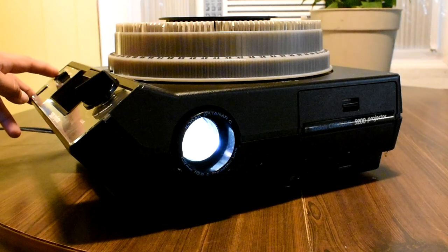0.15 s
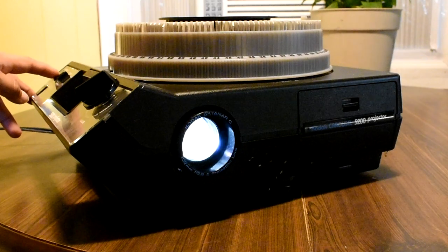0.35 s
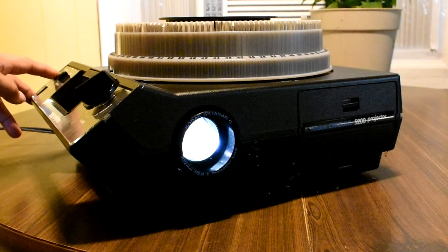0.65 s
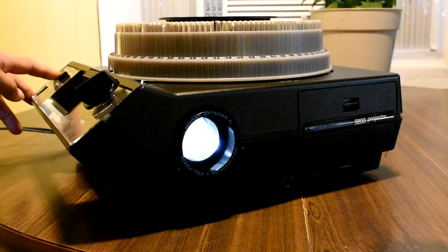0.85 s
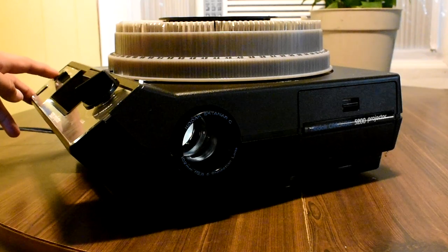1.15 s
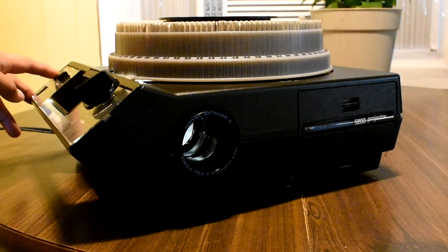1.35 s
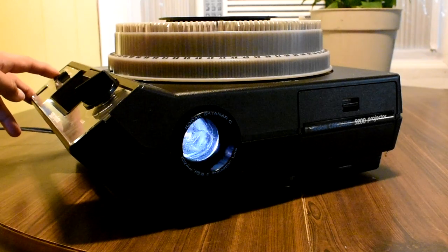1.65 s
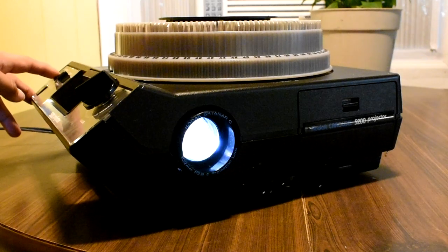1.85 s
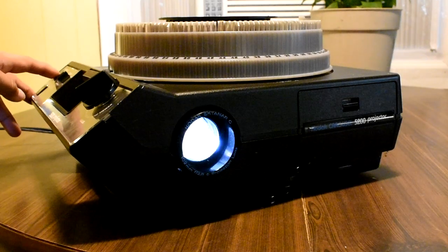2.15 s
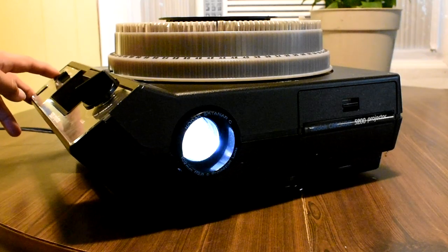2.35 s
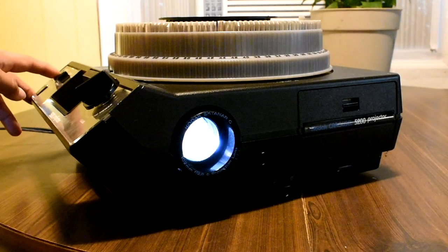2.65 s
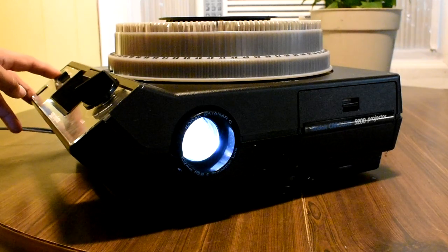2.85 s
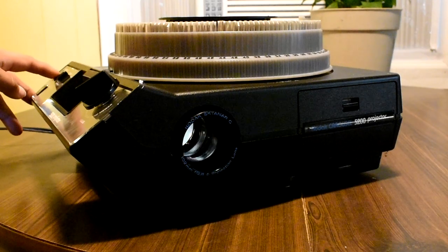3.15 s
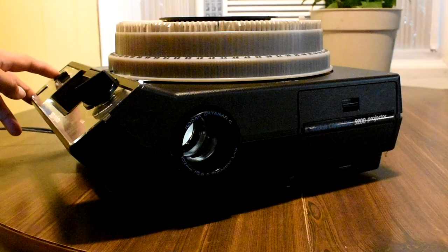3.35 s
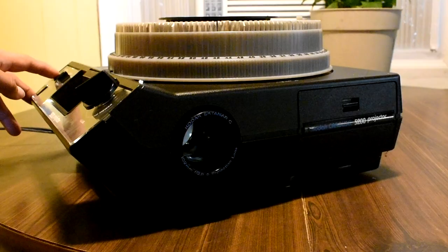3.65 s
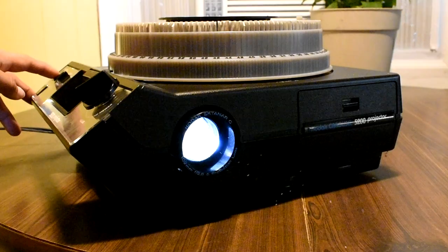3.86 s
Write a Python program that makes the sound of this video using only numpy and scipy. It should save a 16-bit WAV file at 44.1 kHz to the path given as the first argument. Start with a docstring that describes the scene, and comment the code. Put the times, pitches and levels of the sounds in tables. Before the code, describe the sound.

Two bursts of mechanical clicks and clunks from a slide projector, its cooling fan whirring throughout.

```python
"""Two bursts of clicks and clacks over a steady whir: a carousel slide projector changes slides twice.
Each time the gears rustle, the shutter closes, the slide lifts, the tray lever strikes and rings,
latches snap and the next slide drops in. Every blow shakes the plastic case or sets a small part ringing.
A faint thump comes with the loudest clacks. The whir is the cooling fan. A small room adds a short tail."""
import sys
import numpy as np
from scipy import signal
from scipy.fft import rfft, irfft
from scipy.io import wavfile

SR = 44100
rng = np.random.default_rng(int(sys.argv[2]) if len(sys.argv) > 2 else 0)


def generate_wav(sig):
    """Save sig (samples, or channels by samples) to the path in sys.argv[1] as 16-bit PCM at SR."""
    pcm = np.round(np.clip(np.atleast_2d(sig).T, -1, 1) * 32767).astype(np.int16)
    wavfile.write(sys.argv[1], SR, pcm)


N = 176400

# the tray lever's modes (the notes it rings at): f/Hz, level/dB, t60/s (time to fade by 60 dB)
LEVER_MODES = [(1173, -20, .16), (1449, -19, .16), (1642, -10, .16), (1672, -12, .17), (2266, -15, .19),
               (2300, -13, .14), (2358, -10, .17), (2461, 0, .16), (2594, -15, .18)]
# the lever's blows: t/s, level/dB
LEVER_STRIKES = [(1.436, -28.5), (1.4445, -10), (3.557, -36), (3.569, -12)]


def contacts():
    """Parts knock together: each hit cracks, shakes the plastic case and fades in the room."""
    # the hits: t/s, low knock/dB, middle clack/dB, high click/dB
    hits = np.array([ (0.825, -42, -27, -29), (0.832, -22, -23.5, -20), (0.8455, -28, -24.5, -27),
                     (.852, -23.5, -24, -30), (0.891, -35, -31, -31), (0.908, -50, -26, -23.5),
                     (.972, -33, -32, -52), (1.039, -38, -19.5, -20.5), (1.047, -22, -47, -29),
                     (1.084, -42, -34, -32), (1.092, -38, -28, -38), (1.159, -32, -40, -38),
                     (1.174, -27, -31.5, -45), (1.195, -34, -28.5, -33), (1.405, -32, -33, -32),
                     (1.426, -25, -22, -39), (1.433, -26.5, -12, -32), (1.4435, -19, -16.5, -12),
                     (1.559, -31, -18, -15), (1.58, -22.5, -18.5, -26), (1.6361, -46, -20, -19.5),
                     (1.664, -19, -27, -21.5), (1.677, -29.5, -19, -22), (1.688, -47, -17, -40),
                     (1.722, -28, -38, -50), (1.76, -24.5, -50, -54), (1.77, -55, -32.5, -35.5),
                     (2.936, -39, -25.5, -23.5), (2.942, -28, -27, -24), (2.953, -22, -18.5, -19.5),
                     (3.013, -54, -30, -30.5), (3.030, -37, -27.5, -23.5), (3.093, -32, -30, -59),
                     (3.160, -42, -24, -22.5), (3.172, -21, -29, -29), (3.207, -46, -31, -28.5),
                     (3.213, -29, -35, -33), (3.282, -33, -39, -35), (3.294, -29, -24.5, -40),
                     (3.32, -36, -26, -42), (3.527, -37, -28.5, -35), (3.549, -29, -18, -46),
                     (3.557, -27, -17, -31), (3.5671, -19.5, -18, -9.5), (3.58, -30, -10, -62),
                     (3.6825, -26.5, -19, -14), (3.701, -23, -18.5, -29), (3.7605, -34, -22, -18),
                     (3.788, -17.5, -29, -24.5), (3.801, -31, -17, -21.5), (3.819, -42, -37, -31),
                     (3.857, -25, -36, -39), (3.883, -21, -34, -35.5), (3.895, -49, -40, -37.5)])
    case_colour = [(60, -67), (150, -47), (260, -43.5), (370, -18.5), (500, -21.5), (750, -9),
                   (1100, -10.5), (1700, -10.5), (2400, -12.5), (3200, -12), (4500, -14), (6300, -13.5),
                   (8500, -10), (11000, -11), (15000, -16)]  # how strongly the case sounds: f/Hz, level/dB per third octave
    case_fade = [(400, 0.024), (2000, 0.08), (5000, 0.075), (12000, 0.057)]  # how fast it fades: f/Hz, t60/s
    room = [(400, 0.23, -5.5), (2030, 0.37, -8.5), (5000, 0.25, -8.5), (12000, 0.19, -9)]  # the room's tail: f/Hz, t60/s, level/dB
    knock_hz, clack_hz, click_hz = 840, 2200, 8500
    crack_s, swell_cycles = .0006, 1.6
    times, click_db = hits[:, 0], hits[:, 3]
    crack_db = 9 + .95 * (click_db + 9)  # harder clicks crack much more
    edges = 16500 * 2 ** (np.arange(-25, 1) / 3)  # bands a third of an octave wide
    out = np.zeros(N)
    for low, high in zip(edges, edges[1:]):
        hz = np.sqrt(low * high)
        hit_db = [np.interp(np.log(hz), np.log([knock_hz, clack_hz, click_hz]), hit[1:]) for hit in hits]
        db = np.array(hit_db) + at_hz(case_colour, hz)
        blows = impulses(times, from_db(db) ** 2)
        energy = fade(blows, at_hz(case_fade, hz))
        energy += from_db(at_hz(room, hz, column=2)) ** 2 * fade(blows, at_hz(room, hz))
        swell = np.exp(-hz / (swell_cycles * SR))  # low bands build up more slowly
        energy = signal.lfilter([1 - swell], [1, -swell], energy)
        cracks = impulses(times, from_db(db + crack_db) ** 2)
        cracks = signal.lfilter([1], [1, -np.exp(-1 / (crack_s * SR))], cracks)
        energy += min(hz / click_hz, 1) * cracks  # mostly in the treble
        loudness = np.sqrt(energy * SR / 2 / (high - low))
        band = signal.butter(2, [low, high], "band", fs=SR, output="sos")
        out += signal.sosfilt(band, loudness * rng.standard_normal(N))
    return out


def case_echoes(sound):
    """Eight quick echoes inside the case colour every hit in the same way."""
    delays_s = rng.uniform(.0006, .006, 8)
    echoes = impulses(delays_s, .08 * rng.choice([-1, 1], len(delays_s)))
    echoes[0] = 1  # the direct sound
    return signal.fftconvolve(sound, echoes / np.linalg.norm(echoes))[:N]


def lever():
    """The tray lever strikes lightly, then hard, and rings."""
    return struck_part(LEVER_MODES, LEVER_STRIKES)


def slide():
    """The slide drops into place with two quick taps."""
    modes = [(440, -11.5, .08), (510, -9.5, .09), (560, -7.5, .14), (2770, -4, .08), (2872, -2, .08),
             (3010, -5, .05)]  # f/Hz, level/dB, t60/s
    strikes = [(1.666, -23), (1.679, -20), (3.790, -23.5), (3.802, -20)]  # t/s, level/dB
    return struck_part(modes, strikes)


def shutter():
    """The shutter closes with a short, hollow ring."""
    modes = [(550, -4.5, 0.1), (761.4, 3, 0.17), (802, -14, 0.12), (3050, 2, 0.034)]  # f/Hz, level/dB, t60/s
    strikes = [(1.039, -27), (3.161, -26.5)]  # t/s, level/dB
    return struck_part(modes, strikes)


def latches():
    """The latches snap with a high ping."""
    modes = [(3960, -2.5, 0.15), (4700, 3, 0.055), (4930, 3, 0.057), (7700, 0, 0.05)]  # f/Hz, level/dB, t60/s
    strikes = [(.909, -33), (1.560, -25.5), (1.637, -38), (3.031, -32), (3.318, -42), (3.683, -33),
               (3.761, -36)]  # t/s, level/dB
    return struck_part(modes, strikes)


def spring():
    """A jolted spring rings at two close pitches."""
    modes = [(1643, -3, .19), (1672, -1.5, .19)]  # f/Hz, level/dB, t60/s
    strikes = [(1.06, -29.5), (1.115, -34.5), (1.178, -33), (1.454, -23), (3.235, -37), (3.578, -31)]  # t/s, level/dB
    return struck_part(modes, strikes)


def pawl():
    """A light catch (the pawl) gives bright ticks, too brief to shake the case."""
    snaps = [(0.827, -22), (0.8332, -29), (.858, -22), (1.196, -34), (2.9349, -21), (3.559, -22)]  # t/s, level/dB
    times, db = np.transpose(snaps)
    bright_above_hz = 4140
    energy = fade(impulses(times, from_db(db) ** 2), t60=0.01)
    return np.sqrt(energy) * noise(lambda f: f ** 2 / (f ** 2 + bright_above_hz ** 2))


def frame():
    """The projector's frame answers a few blows with a low ring."""
    modes = [(351, -1.5, 0.26), (372.2, 4, 0.18)]  # f/Hz, level/dB, t60/s
    strikes = [(.863, -36), (1.446, -39), (3.571, -39.5)]  # t/s, level/dB
    return struck_part(modes, strikes)


def tray_rubs():
    """The turning tray rubs the lever: many tiny slips, easing off, keep it ringing."""
    rubs = [(1.172, 1.218, -40), (3.292, 3.338, -35)]  # start/s, end/s, level/dB
    slips_per_s = 600
    t, out = np.arange(N) / SR, np.zeros(N)
    slips = (rng.random(N) < slips_per_s / SR) * rng.standard_normal(N)
    for start, end, db in rubs:
        during = (t > start) & (t < end)
        easing = np.sqrt(np.clip((end - t) / (end - start), 0, 1))
        force = slips * during * easing + 1e-18
        sound = sum(ring(force, hz, t60) * from_db(mode_db) for hz, mode_db, t60 in LEVER_MODES)
        out += from_db(db) * sound / sound[during].std()
    return out


def low_thump():
    """A faint, deep thump comes with the loudest clacks."""
    modes = [(62, -48, .08)]  # f/Hz, level/dB, t60/s
    return struck_part(modes, LEVER_STRIKES)


def gears():
    """The gears rustle for as long as a slide change lasts."""
    runs = [(0.844, 1.806, -44), (2.94, 3.925, -44.5)]  # start/s, end/s, level/dB
    colour = [(150, -28), (360, -0.5), (1700, 3), (2600, -3), (4500, -8.5), (15000, -22)]  # the rustle's spectrum: f/Hz, level/dB
    t, ramp_s = np.arange(N) / SR, 0.17
    level = sum(from_db(db) * np.clip(np.minimum(t - start, end - t) / ramp_s, 0, 1)
                for start, end, db in runs)
    return level * noise(lambda f: from_db(at_hz(colour, f)))


def fan():
    """Air flutters through the vents while the motor and blades hum at wavering pitches."""
    colour = [(18, -74), (30, -42), (81, -38.5), (111, -32), (208, -20.5), (243, -10), (277, -21.5),
              (350, -5.5), (479, -12.5), (575, -4.5), (639, -10.5), (709, -0.5), (767, -5.5), (1140, -5.5),
              (1470, -13), (1770, -9.5), (2360, -15.5), (2550, -16.5), (2910, -14.5), (4310, -23),
              (10500, -32.5), (15500, -46)]  # the air's spectrum: f/Hz, level/dB
    tones = [(361, -58, 6), (688, -55, 12), (724, -54.5, 6), (876, -53, 15), (1173, -52, 4.5),
             (1640, -60, 10)]  # motor and blade tones: f/Hz, level/dB, waver/Hz
    air_db, flutter_db = -42, 0.68
    air_level = from_db(air_db + flutter_db * wander(hz=54))
    out = air_level * noise(lambda f: from_db(at_hz(colour, f)))
    for hz, db, waver in tones:
        pitch = hz + waver * wander(waver)
        out += from_db(db) * np.sqrt(2) * np.sin(2 * np.pi * np.cumsum(pitch) / SR)
    return out


def struck_part(modes, strikes):
    """A struck part rings in all its modes, in a slightly different mix at every blow."""
    times, strike_db = np.transpose(strikes)
    spread_db = 2.9 * rng.standard_normal((len(times), len(modes)))
    out = np.zeros(N)
    for k, (hz, mode_db, t60) in enumerate(modes):
        blows = impulses(times, from_db(strike_db + mode_db + spread_db[:, k]))
        out += (-1) ** k * ring(blows, hz, t60)  # every other mode swings the opposite way
    return out


def ring(clicks, hz, t60):
    """Each click starts a fading sine wave as tall as the click."""
    decay, step = 1e-3 ** (1 / (t60 * SR)), 2 * np.pi * hz / SR
    return signal.lfilter([0, np.sin(step)], [1, -2 * decay * np.cos(step), decay * decay], clicks)


def fade(energy, t60):
    """Stored energy drains away by 60 dB in t60 seconds."""
    return signal.lfilter([1], [1, -1e-6 ** (1 / (t60 * SR))], energy)


def impulses(times, sizes):
    """One spike for each event."""
    spikes = np.zeros(N)
    np.add.at(spikes, (times * SR).astype(int), sizes)
    return spikes + 1e-18


def noise(gain_at):
    """Noise of typical size 1, coloured by a gain for each frequency."""
    frequencies = np.arange(N // 2 + 1) * SR / N
    coloured = irfft(rfft(rng.standard_normal(N)) * gain_at(frequencies), N)
    return coloured / coloured.std()


def wander(hz):
    """Random drift up to about the given rate."""
    return noise(lambda f: 1 / (1 + (f / hz) ** 2))


def at_hz(points, hz, column=1):
    """Read between a table's rows on a log-frequency scale."""
    table = np.array(points)
    return np.interp(np.log(hz + 1e-9), np.log(table[:, 0]), table[:, column])


def from_db(db):
    """Turn decibels into a gain."""
    return 10 ** (np.asarray(db) / 20)


def scene():
    """The slide changes over the running fan, heard from close by."""
    whir = fan() + gears()
    rings = lever() + shutter() + latches() + slide() + frame() + spring() + tray_rubs()
    bass_cut = signal.butter(4, 237, "high", fs=SR, output="sos")  # small parts give off little bass
    rings = signal.sosfilt(bass_cut, rings)
    return (whir + rings + low_thump() + pawl() + case_echoes(contacts()))[None]


def record(dry):
    """The loudest peaks are rounded off and the highest treble is cut."""
    ceiling, cutoff_hz = 1.05, 15750
    rounded = dry / (1 + (dry / ceiling) ** 4) ** .25
    treble_cut = signal.ellip(12, .1, 80, cutoff_hz, fs=SR, output="sos")
    return signal.sosfilt(treble_cut, rounded)


dry = scene()
out = record(dry)
generate_wav(out)
```